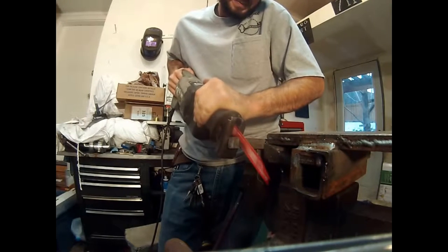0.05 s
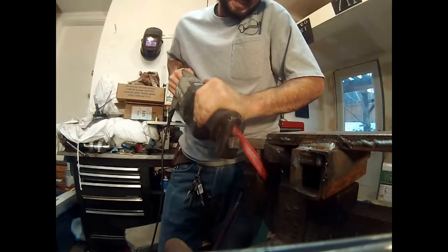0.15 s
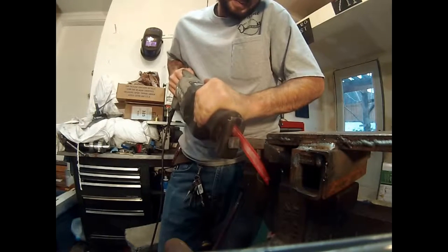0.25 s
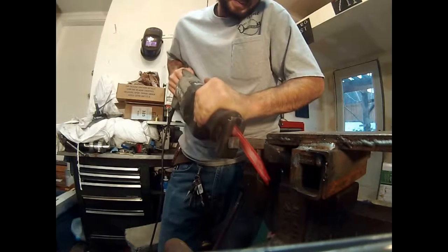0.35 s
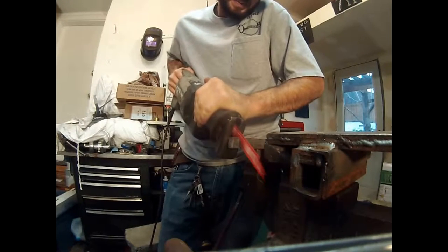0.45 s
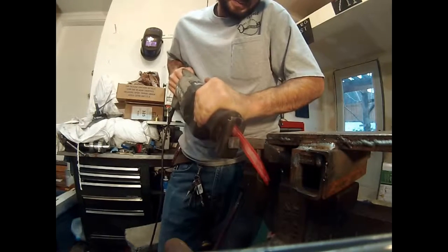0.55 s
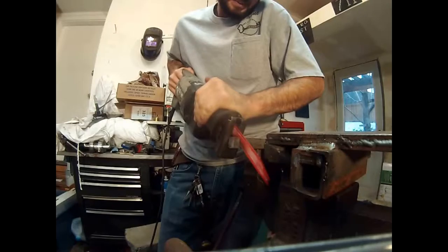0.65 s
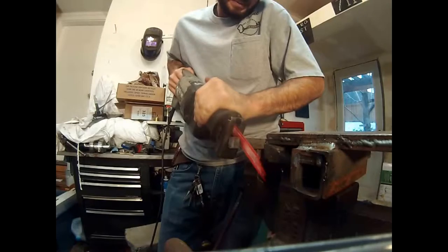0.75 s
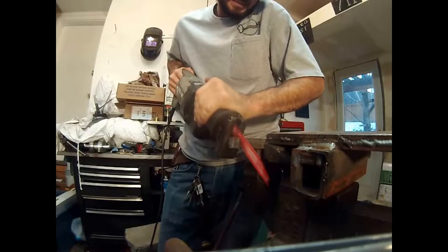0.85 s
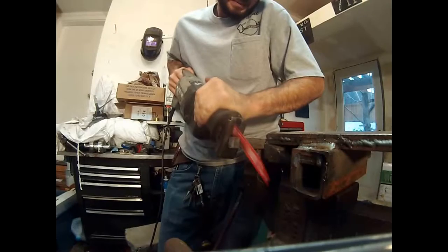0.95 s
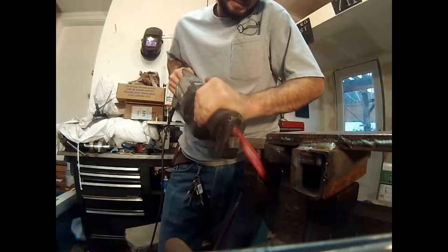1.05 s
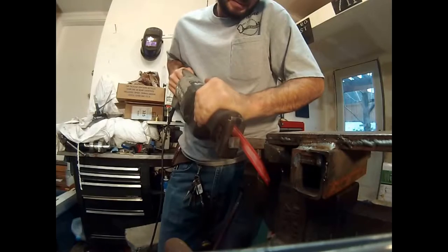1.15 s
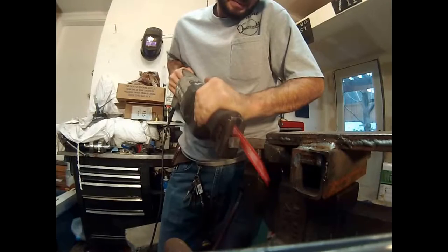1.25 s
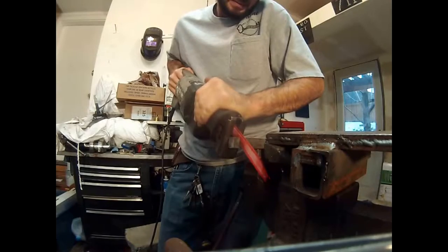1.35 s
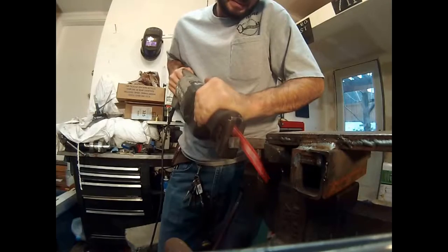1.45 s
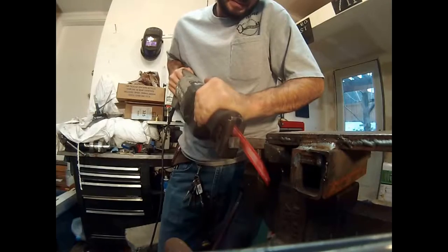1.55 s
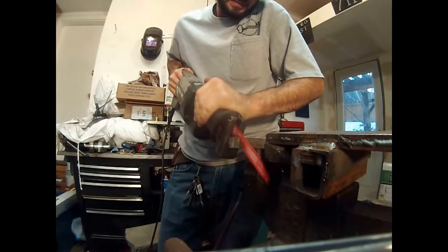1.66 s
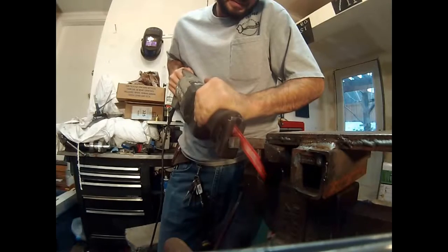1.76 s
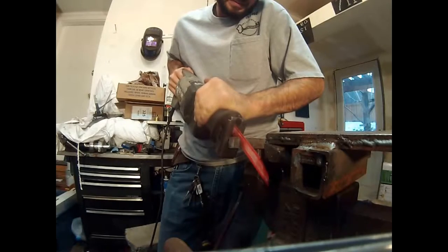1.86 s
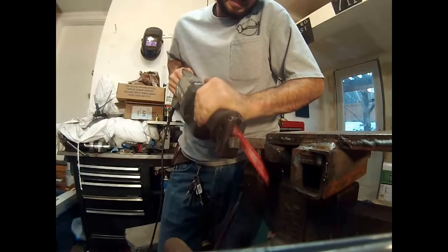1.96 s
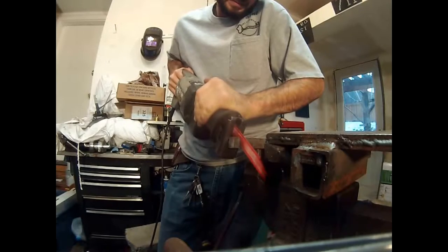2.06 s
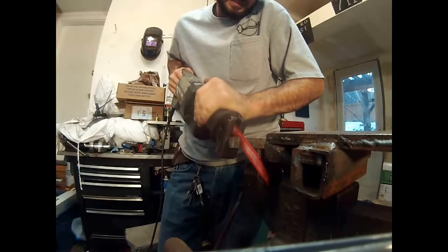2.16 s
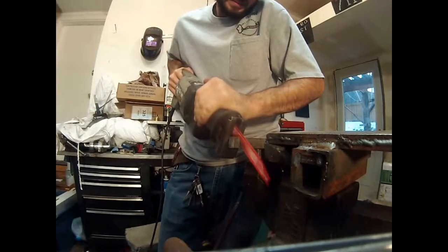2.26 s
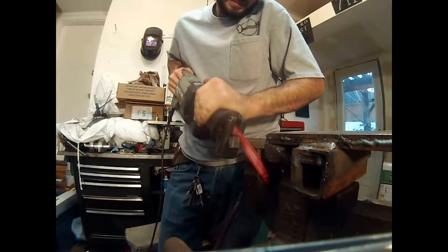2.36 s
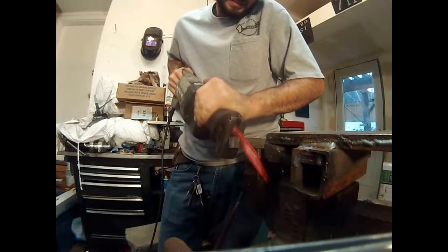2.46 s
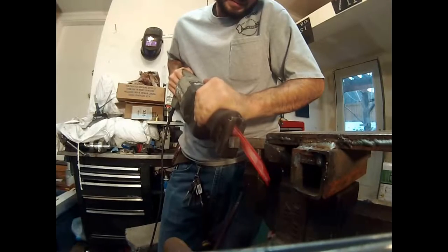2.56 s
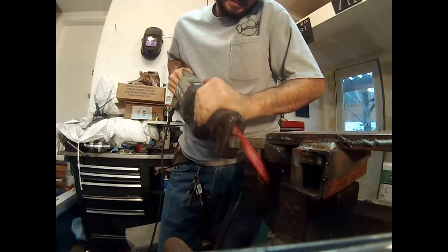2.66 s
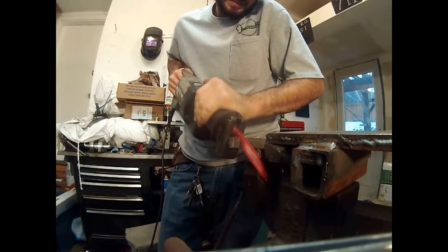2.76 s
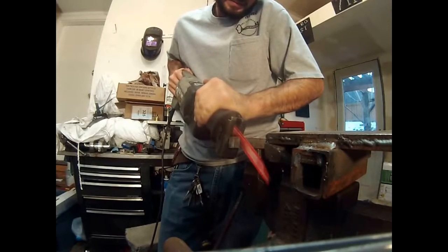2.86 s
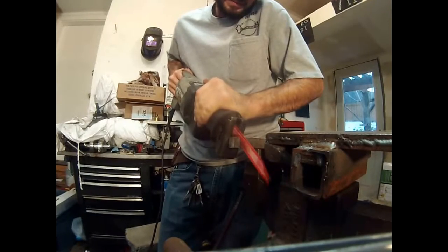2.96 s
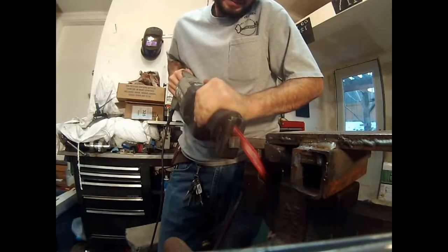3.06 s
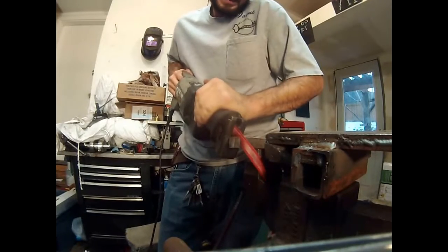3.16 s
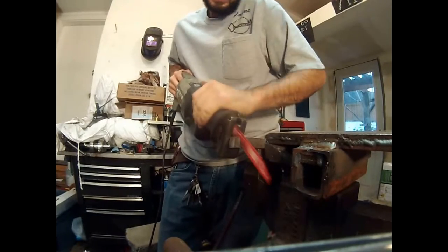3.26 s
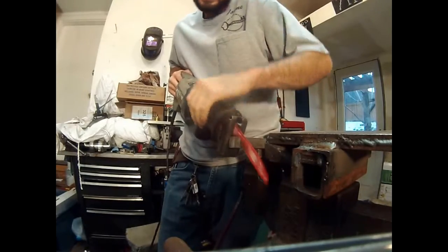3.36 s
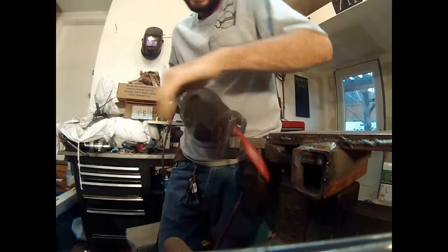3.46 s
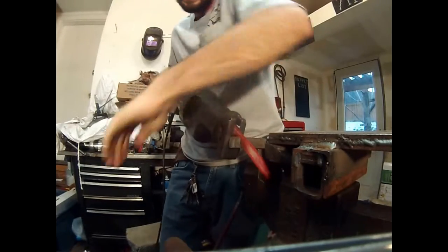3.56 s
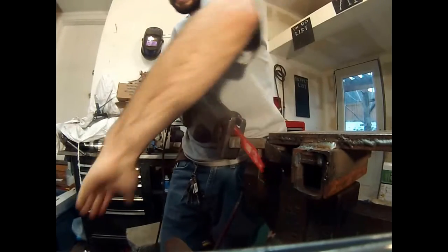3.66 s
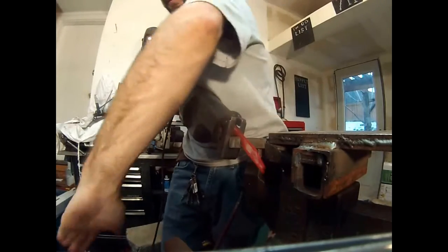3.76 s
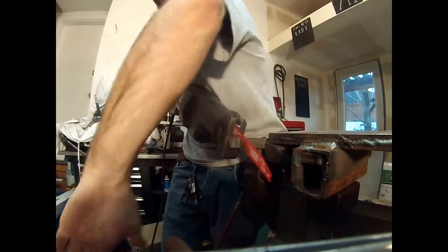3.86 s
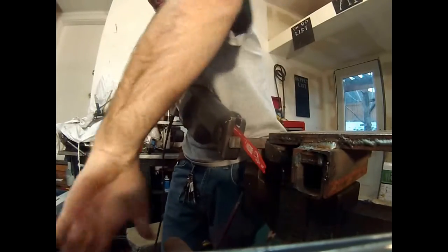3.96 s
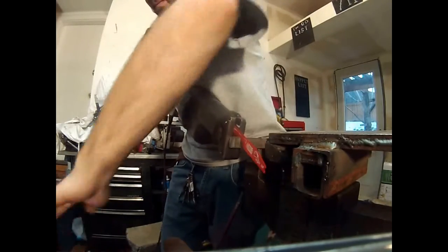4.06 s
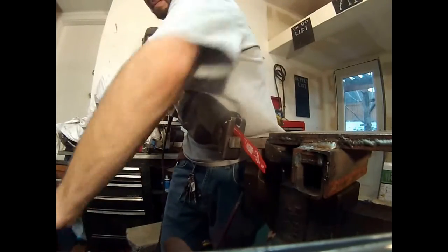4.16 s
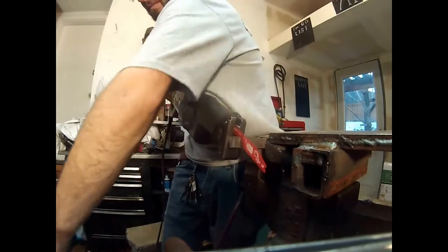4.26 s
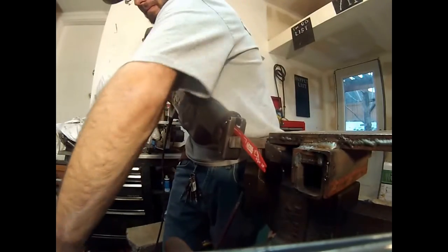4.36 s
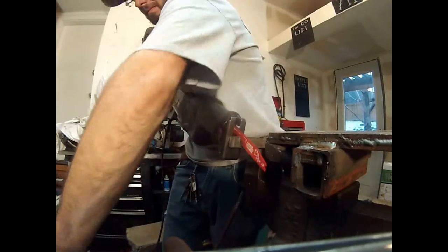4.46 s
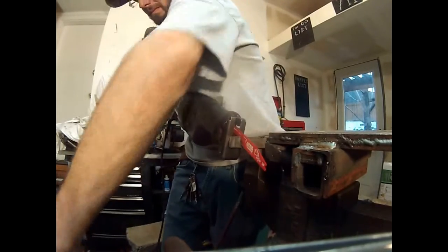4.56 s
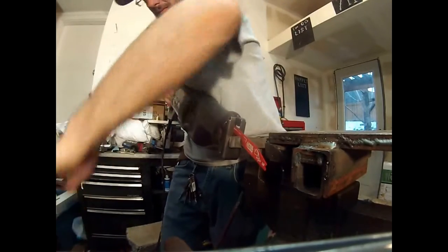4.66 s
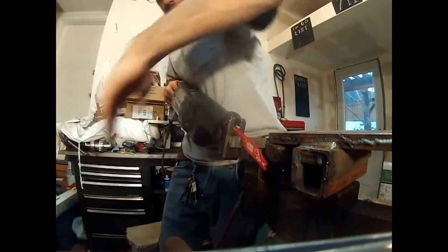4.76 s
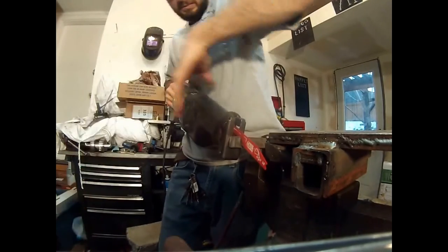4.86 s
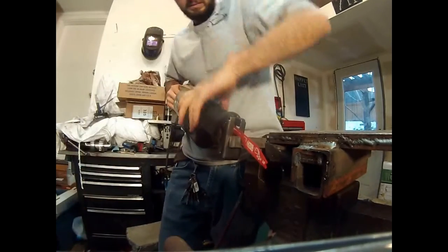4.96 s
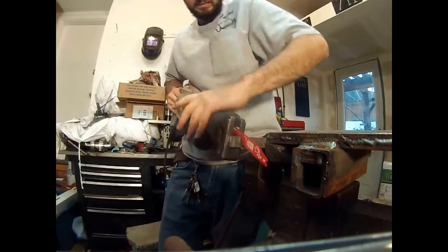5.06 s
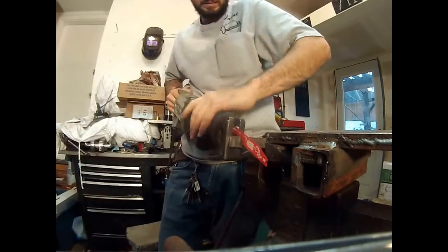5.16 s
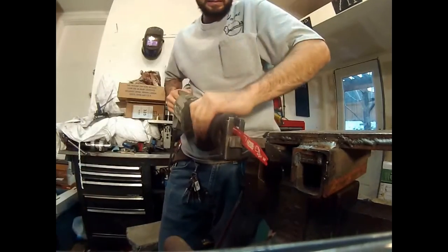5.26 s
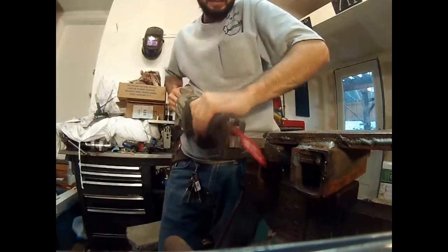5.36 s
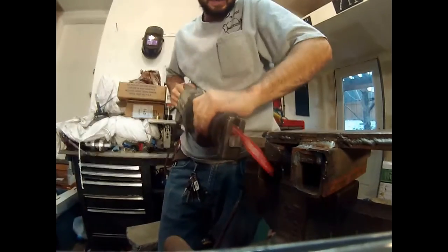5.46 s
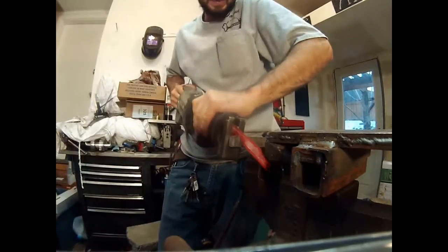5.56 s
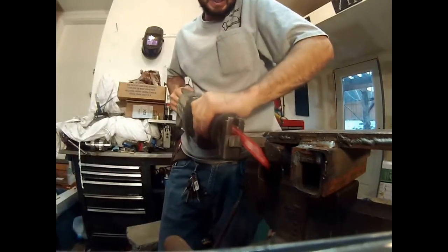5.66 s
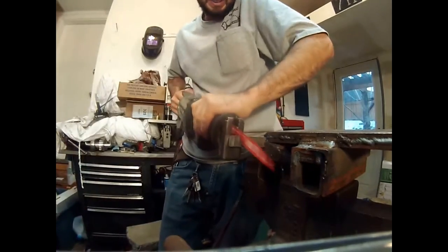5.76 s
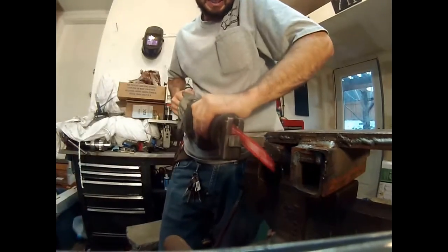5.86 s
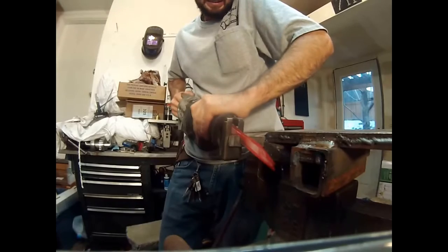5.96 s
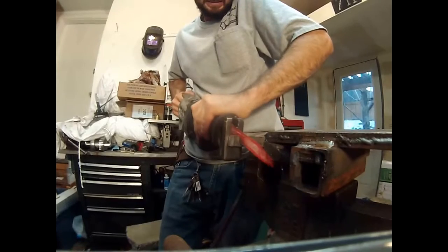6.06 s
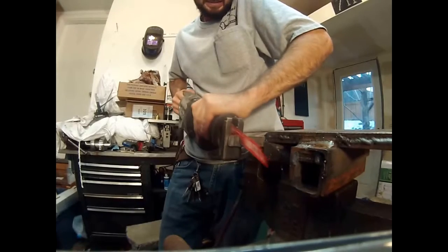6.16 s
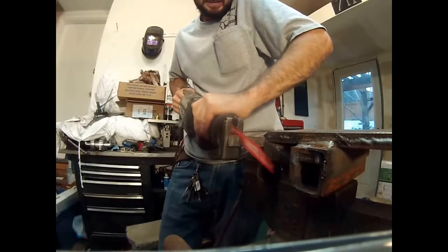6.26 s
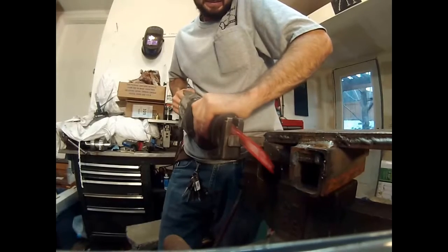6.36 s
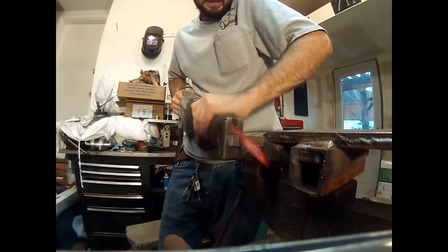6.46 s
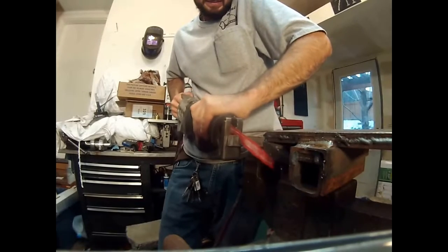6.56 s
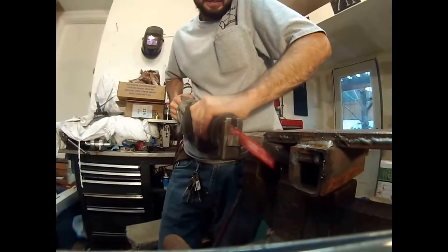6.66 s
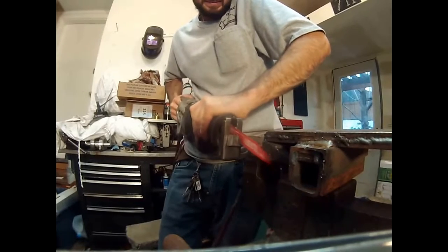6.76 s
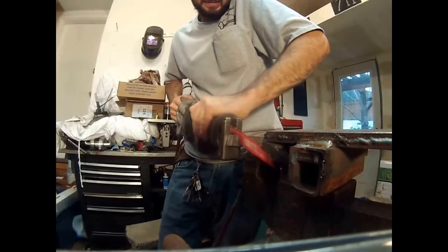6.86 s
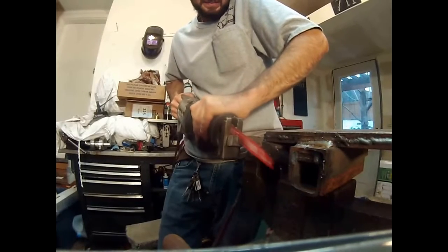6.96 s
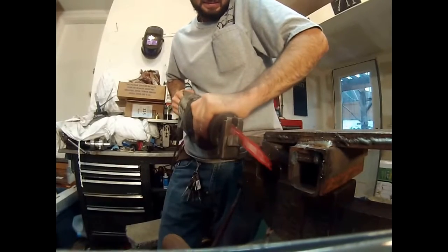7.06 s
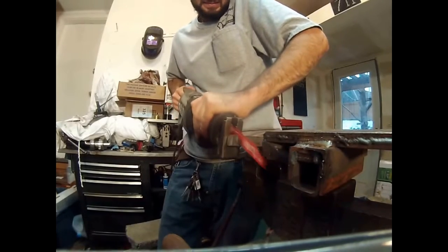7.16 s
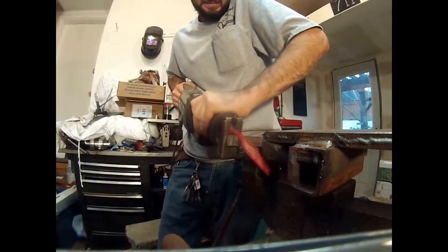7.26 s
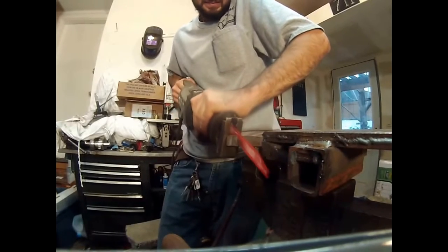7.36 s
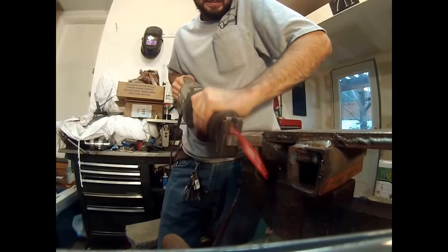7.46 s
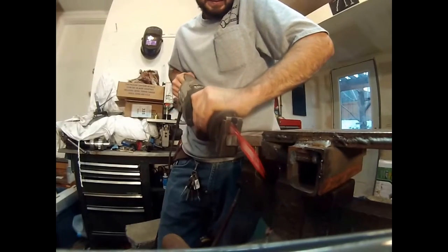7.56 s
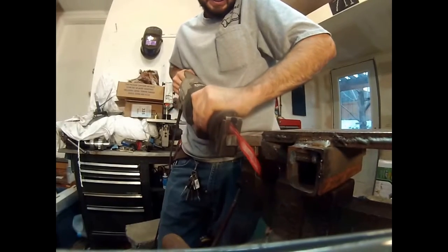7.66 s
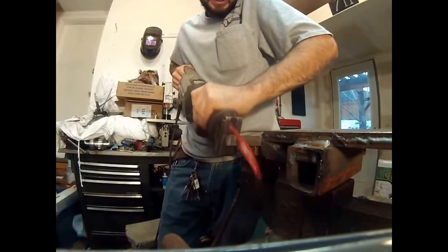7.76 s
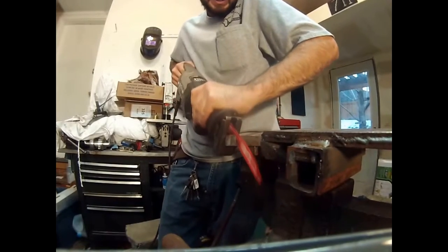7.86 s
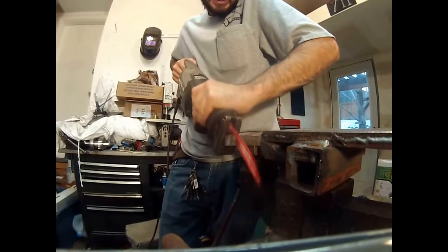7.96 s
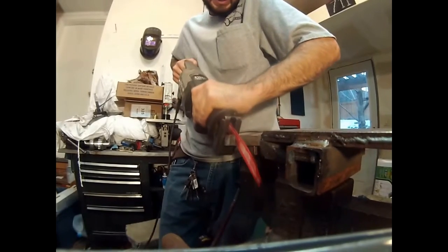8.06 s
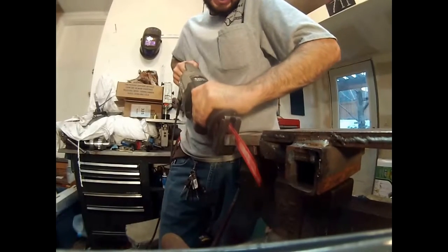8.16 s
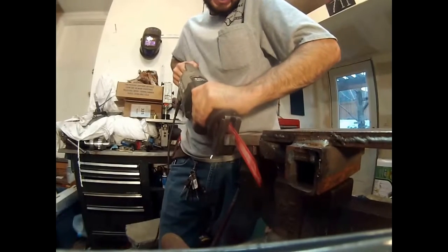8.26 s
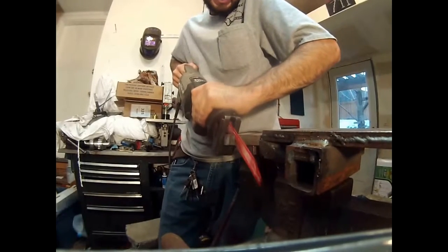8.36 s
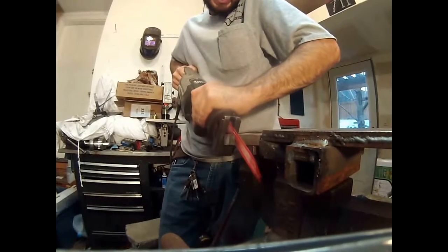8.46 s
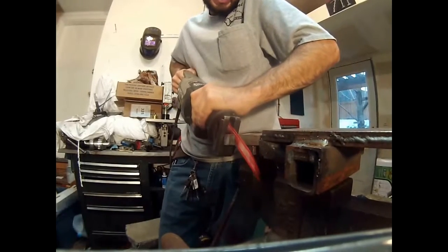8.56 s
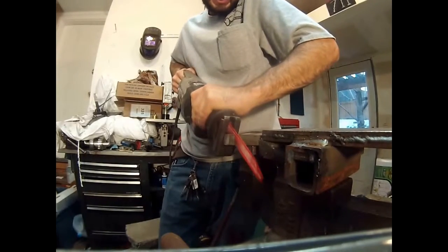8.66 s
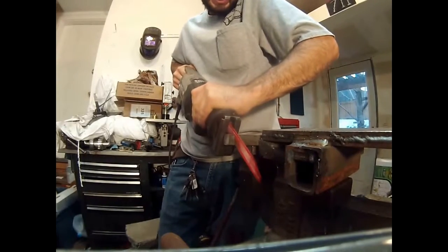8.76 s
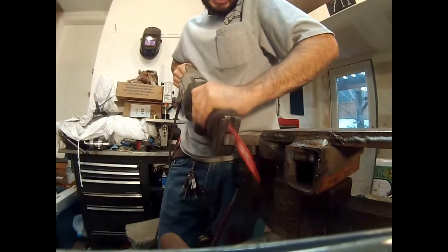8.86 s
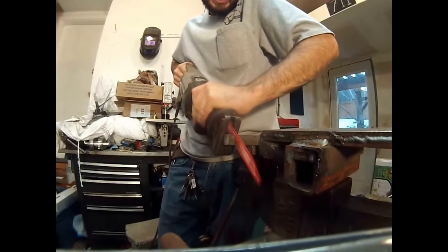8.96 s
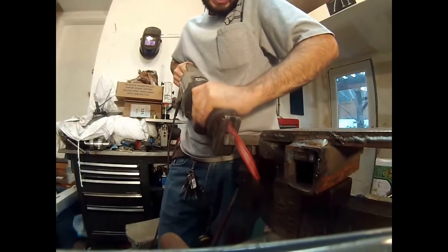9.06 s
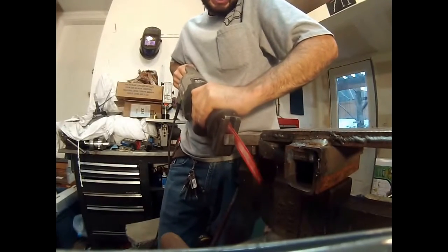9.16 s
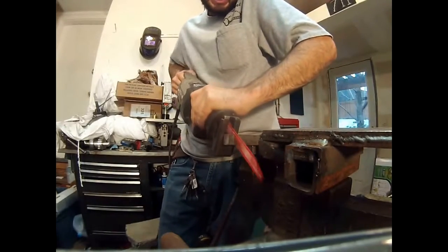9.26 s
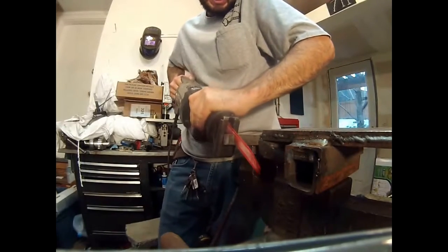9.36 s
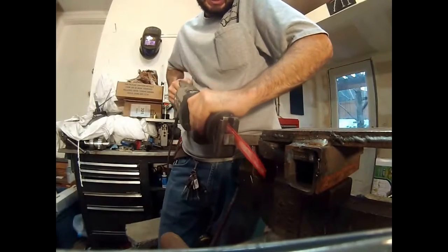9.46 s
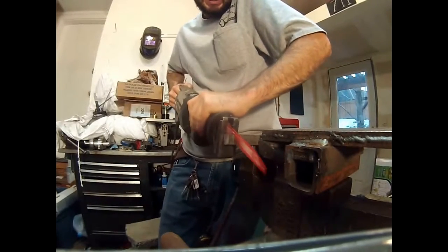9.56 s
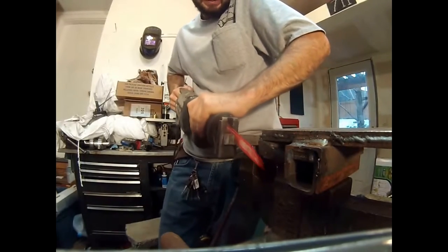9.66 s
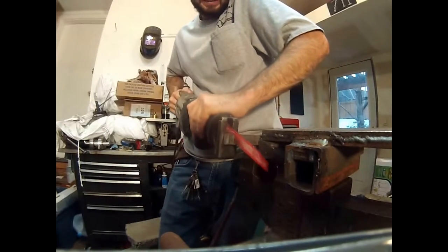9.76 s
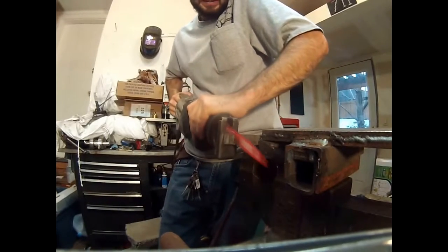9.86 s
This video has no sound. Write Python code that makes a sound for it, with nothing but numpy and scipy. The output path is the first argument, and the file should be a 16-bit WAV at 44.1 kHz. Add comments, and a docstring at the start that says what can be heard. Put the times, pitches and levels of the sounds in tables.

```python
"""A corded reciprocating saw cuts a steel bar held in a vice, close by in a small workshop.
The gears whine, the housing shakes, the teeth rasp and set blade and bar ringing, and the slider
clacks once a stroke. At 3 s the trigger is released and the saw knocks loosely as it coasts to a stop.
A steel piece clinks, is dragged aside and rings; two faint squeaks follow. At 5.3 s the saw jerks
back into the cut, where the blade catches now and then and the shoe hammers the bar."""
import sys
import numpy as np
from scipy import signal
from scipy.fft import rfft, irfft
from scipy.io import wavfile

SR = 44100
rng = np.random.default_rng(int(sys.argv[2]) if len(sys.argv) > 2 else 0)


def file_out(sig):
    """Save sig as 16-bit WAV at sys.argv[1]."""
    # one column per channel
    cols = np.atleast_2d(sig).T
    # limit, then scale
    lim = np.clip(cols, -1, 1)
    pcm = np.round(lim * 32767).astype(np.int16)
    wavfile.write(sys.argv[1], SR, pcm)


N = 436590
TIME = np.arange(N) / SR


def amp(db):
    """Decibels to gain."""
    return 10 ** (np.asarray(db) / 20)


def unit(x):
    """Scales to rms 1."""
    return x / np.sqrt(np.mean(x ** 2) + 1e-20)


def follow(rows):
    """An automation curve's value at every sample."""
    return np.interp(TIME, *np.transpose(rows))


def read(points, hz):
    """Looks up a curve on a log-frequency axis."""
    f, value = np.transpose(points)
    return np.interp(np.log(hz + 1), np.log(f), value)


def add(mix, start_s, sound):
    """Mixes a sound in at start_s."""
    part = mix[round(start_s * SR):][:len(sound)]
    part += sound[:len(part)]


def wander(hz):
    """Smooth random modulation of rms 1, rolled off above hz."""
    return unit(irfft(rfft(rng.standard_normal(N)) / (1 + (np.fft.rfftfreq(N, 1 / SR) / hz) ** 4), N))


def grit(spread_db):
    """Noise in tiny clumps, as of many small impacts."""
    return unit(rng.standard_normal(N) * amp(spread_db * np.clip(wander(470), -3, 2.5)))


def colour(x, points, size=4096):
    """Causal EQ of unit energy with the given curve."""
    log_gain = np.log(amp(read(points, abs(np.fft.fftfreq(size, 1 / SR)))))
    taps = np.fft.ifft(np.exp(np.conj(signal.hilbert(log_gain)))).real[:size // 2]
    return signal.oaconvolve(x, taps / np.linalg.norm(taps))[:N]


def ring(x, modes):
    """Drives a bank of steep-skirted resonators; rms 1."""
    out = np.zeros(N)
    for hz, width, db in modes:
        pole = np.exp((2j * np.pi * hz - np.pi * width * np.sqrt(2)) / SR)
        out += amp(db) * unit(signal.lfilter([1], np.poly([pole, pole]), x).real)
    return unit(out)


def lobe(turns, at, width):
    """A bump once a stroke; place and width are shares of the stroke."""
    return np.exp(-.5 * (((turns - at + .5) % 1 - .5) / width) ** 2)


def swell(start, length, attack_s, release_s):
    """Attack, hold and release of one gesture."""
    rise = 1 - np.exp(-np.maximum(TIME - start, 0) / attack_s)
    return rise * np.exp(-np.maximum(TIME - start - length, 0) / release_s)


def bursts(times, dbs, rise_s, decay_s):
    """Short noise hits, each at its own level."""
    t, out = np.arange(SR // 6) / SR, np.zeros(N)
    shape = (1 - np.exp(-t / rise_s)) * np.exp(-t / decay_s)
    for start, db in zip(times, dbs):
        add(out, start, amp(db) * shape / shape.max() * rng.standard_normal(len(t)))
    return out


RELEASE_S, STICK_S, RESTART_S = 3.084, 4.04, 5.33  # trigger let go, blade sticks, trigger pulled
FULL_HZ = 33  # strokes per second
# Saw speed with the trigger held, one curve per cut: time_s, stroke_rate_hz
FIRST_CUT_SPEED = [(0, 33.42), (0.42, 33.68), (1.1, 33.01), (2.33, 32.83), (2.67, 33.43), (3.1, 32.87)]
SECOND_CUT_SPEED = [(5.33, 0), (5.37, 21), (5.4, 26), (5.45, 18), (5.73, 32.82), (6.09, 30.79),
                    (6.2, 33.04), (6.94, 32.98), (7.59, 31.83), (8.07, 29.8), (8.68, 33.6), (9.9, 33.5)]
def stroke_rate(friction_hz_per_s=24.24, drag_s=2.343):
    """Strokes per second; between the cuts, friction and air drag slow the motor until the blade sticks."""
    brake = friction_hz_per_s * drag_s
    drag = np.exp(-np.maximum(TIME - RELEASE_S, 0) / drag_s)
    first_run = (follow(FIRST_CUT_SPEED) + brake) * drag - brake
    return np.maximum(first_run, 0) * (TIME < STICK_S) + follow(SECOND_CUT_SPEED)


# Level of the saw's own whine and shake, which falls while the blade is loaded: time_s, gain_db
TOOL_NOISE_LEVEL = [(0, 0), (1.7, 1.6), (2.9, 0.5), (5.4, 2.5), (5.75, -4), (6.7, -3.5), (7.1, -5), (8.2, -3.5),
                    (8.75, -1), (9.35, 0.4), (9.9, -7.5)]
# Commutator whistle, before it fades with lost speed: time_s, level_db
WHISTLE_RIDE = [(0, -28.5), (.7, -25), (2.2, -25), (2.5, -34), (5.7, -32.5)]
# Gearcase resonances: pitch_hz, width_hz, gain_db
GEARCASE_MODES = [(1080, 67, 3.5), (1173, 19.6, -1.5), (1270, 84, 1), (1695, 75, 0.5)]
def motor(turns, speed, slow_db):
    """Gear mesh and commutator; the crank loads the gears twice a stroke, so the whine sways and throbs."""
    mesh, commutator = 60 * turns, 60 * 12 / 7 * turns
    sway = 0.095 * np.sin(2 * np.pi * turns) + 0.055 * wander(60) + 0.018 * wander(26)
    throb = unit(.18 + lobe(turns, .06, .12) + .75 * lobe(turns, .38, .11))
    gears = throb * amp(2 * wander(54)) * np.sin(2 * np.pi * (mesh + sway))
    gears += amp(-19) * throb * np.sin(4 * np.pi * (mesh + sway))
    whistle = np.sin(2 * np.pi * (commutator + 0.06 * wander(30)))
    whistle *= amp(follow(WHISTLE_RIDE) + 11 * slow_db)
    rattle = amp(-6.5) * ring(throb * grit(1.6), GEARCASE_MODES)
    coast_fade_db = 2.5 * (np.maximum(FULL_HZ - speed, 0) / 10) ** 3 * (TIME < RESTART_S)
    return amp(-21 + follow(TOOL_NOISE_LEVEL) - coast_fade_db) * (gears + rattle) + whistle


# Low buzz of the housing: stroke_harmonic, gain_db
SHAKE_HARMONICS = [(1, -41), (2, -6.5), (3, 1), (4, -3), (5, -6), (6, -1), (10, -7.5), (14, -10)]
# Boom of the tool and bench when jerked: pitch_hz, width_hz, gain_db
LURCH_MODES = [(70, 22, -11), (107, 30, -1), (200, 67, -6.5)]
def housing(turns, speed):
    """The sliding mass shakes the tool at multiples of the stroke rate; at low speed it lurches."""
    buzz = sum(amp(db) * (1 + 0.21 * wander(3.3)) * np.sin(2 * np.pi * k * turns + 0.3016 * k ** 2)
               for k, db in SHAKE_HARMONICS)
    steady = np.clip((speed - 24) / 7, 0, 1)
    lurch = np.sqrt(speed / 25) * ring(grit(0.91), LURCH_MODES)
    return amp(-29.5 + 1.16 * follow(TOOL_NOISE_LEVEL)) * (steady * unit(buzz) + (1 - steady) * lurch)


# Leaning the saw into the bar: start_s, length_s, thump_db, chatter_db
LEANS = [(-.1, 3.22, -30, -40.5), (5.4, 0.042, -45, -17.5), (5.63, 0.27, -52, -22.5),
         (5.984, 0.13, -22.5, -22), (6.233, 0.039, -28, -32), (6.586, 0.26, -23.5, -25.5),
         (7.21, 0.52, -23.5, -27.5), (7.828, 0.25, -22, -22), (8.207, 0.3, -40, -29),
         (8.98, 0.35, -28, -31), (9.632, 0.099, -25.5, -42), (9.81, .1, -22.5, -22)]
def leaning(slow_db):
    """Gains of the shoe's thump and the blade's chatter, which swell as the saw is pushed in."""
    thump, chatter = amp(-35.5 + 0.8 * slow_db), amp(-32 + 0.51 * slow_db)
    for start, length, thump_db, chatter_db in LEANS:
        push = swell(start, length, attack_s=0.025, release_s=0.077)
        thump = np.hypot(thump, amp(thump_db) * push)
        chatter = np.hypot(chatter, amp(chatter_db) * push)
    return thump, chatter


# EQ of teeth rasping on steel: frequency_hz, gain_db
RASP_EQ = [(60, -10), (250, -8.5), (900, -6.5), (1300, -3.5), (1800, 3), (2700, -4), (4000, -0.5),
           (7000, -10.5), (8800, -20.5), (11500, -22.5), (13500, -16.5), (15300, -25)]
# Blade chatter, squeal of the cut's edges and high screech of the teeth: pitch_hz, width_hz, gain_db
BLADE_MODES = [(1027.8, 24, 0)]
KERF_MODES = [(1540, 7.7, -13), (1735, 25, -2), (1866, 175, 2)]
SCREECH_MODES = [(6700, 74, 12), (8170, 47, 0), (9690, 50, -4.5), (10169, 36, -9), (10616, 30, -24),
                 (13300, 90, 1), (13313, 30, -18)]
def teeth(turns, rasp_db, squeal_db, chatter):
    """Teeth scrape in both directions and ring the blade and the edges of the cut."""
    rub = unit(0.77 + 0.16 * lobe(turns, 0.61, 0.11) + 0.59 * lobe(turns, 0.98, 0.05))
    snag = amp(np.clip(0.063 * (squeal_db + 48), .5, 3) * wander(27))  # more pressure, less even bite
    rasp = amp(rasp_db + 1) * colour(unit(rub * snag) * grit(1.9), RASP_EQ)
    flex = ring(grit(0.55), BLADE_MODES)
    flex /= abs(signal.hilbert(flex)) ** .5  # friction limits the blade's swing
    blade = amp(-1) * chatter * unit(flex * (0.33 + lobe(turns, 0.32, 0.23)))
    squeal = amp(squeal_db) * ring(rub * grit(5.6), KERF_MODES)
    grab = amp(3 * np.clip(wander(18), -2, 1))
    screech = amp(1.31 * squeal_db) * ring(rub * grab * grit(7.6), SCREECH_MODES)
    return rasp + blade + squeal + screech


# Bright ring of the slider and its guide: pitch_hz, width_hz, gain_db
CLACK_MODES = [(3100, 780, 8), (5570, 930, 4), (6490, 410, 2), (7630, 160, -1), (13040, 400, -5.5)]
# Dull EQ of the shoe pressing on the bar: frequency_hz, gain_db
THUMP_EQ = [(22, -37), (50, -21), (95, -4.5), (180, 3), (280, -3), (480, 4), (680, -2.5), (1200, -7.5),
            (6000, -64.5)]
def slider(turns, speed, rasp_db, squeal_db, thump):
    """Play in the drive clacks at the turn of each stroke; then the shoe thumps on the bar."""
    stroke = np.floor(turns + .5).astype(int)
    force, timing, push = rng.standard_normal((stroke.max() + 1, 3))[stroke].T
    since_hit = (turns + .5) % 1 - .5 + .03 * (1 + 0.23 * timing)  # in strokes
    up_to_speed = np.clip((speed - 28) / 3, 0, 1)
    hit = (since_hit > 0) * np.exp(-abs(since_hit) / .06) * amp(1.1 * force) * up_to_speed
    contact = unit(hit * grit(0.88))
    cushion_db = .5 * np.maximum(squeal_db + 35.5, 0)  # a hard-pressed blade takes up the play
    clack = ring(contact, CLACK_MODES) + amp(-5) * colour(contact, RASP_EQ)
    press = unit(.15 + lobe(turns, .3, .09) * amp(1.5 * push))
    return amp(rasp_db - 8 - cushion_db) * clack + thump * colour(press * grit(1.5), THUMP_EQ)


# The bar singing under the saw: pitch_hz, width_hz, gain_db
BAR_MODES = [(779.5, 19.5, 8), (1179, 60, 3), (2308, 35, 7.5), (2558, 70, 6), (3990, 26, 4),
             (13200, 300, -19)]
# Its ring-out as the saw stops: pitch_hz, level_db, t60_s
BAR_RING_OUT = [(768, -27.5, 0.46), (1154, -27, 0.3), (3890, -41, 1.5)]
def bar(rasp_db, running):
    """The clamped bar sings along with the saw and rings on after the first cut's last stroke."""
    song = amp(-15 + 0.67 * rasp_db) * ring(running * grit(2.4), BAR_MODES)
    t = np.arange(SR) / SR
    tail = sum(amp(db - 60 * t / t60) * np.sin(2 * np.pi * hz * t) for hz, db, t60 in BAR_RING_OUT)
    add(song, HARD_KNOCKS[0][0], tail)
    return song


# Hard knocks as the saw stops and restarts, in relative levels: start_s, clack_db, thump_db
HARD_KNOCKS = [(3.9512, -9, -15), (4.028, -13.5, -38), (5.343, -8.5, -24.5), (5.416, -14, -30),
               (5.475, -10, -24), (5.612, -10, -41)]
# EQ of the shoe striking the bar: frequency_hz, gain_db
SHOE_HIT_EQ = [(100, -7), (900, -9.5), (1100, 10), (1450, -7), (2200, 6.5), (3000, -1), (9000, -23)]
def knocks(stroke_s, stroke_hz):
    """Coasting strokes, the stop and the start knock the slider, each jerking the whole tool."""
    slow = (stroke_hz > 7) & (stroke_hz < 29.5) & (stroke_s > RELEASE_S) & (stroke_s < STICK_S)
    scatter_db = .6 * rng.standard_normal(slow.sum())
    loose = [(start, -14 + db, -16.5 - 0.3251 * hz + db)  # the slower the stroke, the heavier the thump
             for start, hz, db in zip(stroke_s[slow], stroke_hz[slow], scatter_db)]
    starts, clack_db, thump_db = np.transpose(HARD_KNOCKS + loose)
    contact = bursts(starts, clack_db, rise_s=.0002, decay_s=.0018)
    clacks = amp(1) * contact.std() * ring(contact, CLACK_MODES) + amp(-4.5) * colour(contact, RASP_EQ)
    jerk = bursts(starts + 0.00731, thump_db - 5.5, rise_s=0.0031, decay_s=0.019)
    thumps = colour(jerk, THUMP_EQ) + amp(-8.5) * jerk.std() * ring(jerk, LURCH_MODES)
    # the shoe rattles back onto the bar
    rebound = bursts(starts + .01, thump_db - .5, rise_s=0.001, decay_s=0.0065)
    return clacks + thumps + colour(rebound, SHOE_HIT_EQ)


# Clinks of the steel piece: start_s, level_db, damped_after_s
STEEL_CLINKS = [(4.044, -26, 0.059), (4.591, -26, .9)]
# Its bright partials: pitch_hz, gain_db, t60_s
STEEL_MODES = [(4760, -23, .6), (5055, -5, 0.37), (5640, -6, .4), (5950, 0, 0.77), (7278, -4, 0.54),
               (8560, -7, 0.23), (9300, -18, 0.25), (10370, -12, 0.37), (11180, -22, .2), (11600, -8, .22),
               (13330, -14, 0.18), (13880, -13, .36)]
def clinks():
    """The struck steel piece rings until a hand damps it; each mode is a close pair, so it beats."""
    t, out = np.arange(SR) / SR, np.zeros(N)
    for start, level_db, damped_after_s in STEEL_CLINKS:
        partials = np.zeros(SR)
        for hz, db, t60 in STEEL_MODES:
            beat = 1 + 0.26 * np.cos(2 * np.pi * rng.uniform(10, 40.6) * t)
            partials += amp(db - 60 * t / t60) * np.sin(2 * np.pi * hz * t) * beat
        strike = 1 + np.exp(-t / 0.006) * wander(950)[:SR]  # the contact chatters for an instant
        damping = np.exp(-np.maximum(t - damped_after_s, 0) / 0.0027)
        add(out, start, amp(level_db) * partials * strike * damping)
    return out


# The steel piece sliding, a hand over the grip, then the motor's brief hum as it starts:
# start_s, length_s, level_db
HANDLING_SLIDES = [(4.341, .2, -31), (4.582, 0.067, -34.5), (5.028, 0.13, -51), (5.318, .015, -33)]
# Small handling taps: start_s, relative_level_db
HANDLING_TAPS = [(4.432, -9), (4.46, -10), (4.532, -32), (4.58, -11), (4.937, -31.5), (5.267, -40),
                 (5.299, -34.5)]
# EQ of the slides and taps: frequency_hz, gain_db
HANDLING_EQ = [(40, -30), (100, 1), (220, -5.5), (550, -1), (2200, -5), (6000, -10), (15000, -26)]
def handling():
    """Gritty swells and light bumps as the steel is dragged aside and the saw is taken up and started."""
    sliding = sum(amp(db) * swell(start, length, attack_s=0.021, release_s=0.043)
                  for start, length, db in HANDLING_SLIDES)
    scrape = sliding * grit(2.1) * amp(1.8 * wander(90))
    starts, tap_db = np.transpose(HANDLING_TAPS)
    taps = bursts(starts, tap_db - 11.5, rise_s=0.00047, decay_s=0.0078)
    return colour(scrape + taps, HANDLING_EQ)


# Faint squeaks: start_s, length_s, level_db
FAINT_SQUEAKS = [(4.83, 0.059, -59), (5.12, 0.031, -46)]
# Their thin tone: pitch_hz, width_hz, gain_db
SQUEAK_MODES = [(3820, 36, 0)]
def faint_squeaks():
    """Two faint, thin squeaks near 3.8 kHz in the pause."""
    envelope = sum(amp(db) * swell(start, length, attack_s=.01, release_s=.012)
                   for start, length, db in FAINT_SQUEAKS)
    return envelope * ring(grit(1), SQUEAK_MODES)


# The blade catching in the second cut: start_s, length_s, relative_level_db
BLADE_CATCHES = [(5.42, .08, -11), (7.89, .23, -9.5), (8.12, .16, -15), (9.4, .03, -13)]
def hammering(stroke_s, lead_s=.007):
    """While the blade is caught, the shoe is thrown against the bar just before each stroke turns."""
    hits = [(s, db) for start, length, db in BLADE_CATCHES for s in stroke_s if start <= s < start + length]
    starts, hit_db = np.transpose(hits)
    return colour(bursts(starts - lead_s, hit_db - 1, rise_s=0.0035, decay_s=0.006), SHOE_HIT_EQ)


# Reverb time of the workshop: frequency_hz, t60_s
ROOM_DECAY = [(1000, 0.65), (14000, 0.15)]
def workshop(x):
    """Dense reflections off near walls, the treble dying first."""
    size = SR // 2
    reflections = rng.standard_normal(size) * (rng.random(size) < 3000 / SR)
    reflections *= np.arange(size) > SR // 250  # 4 ms pre-delay
    hz, t, spectrum = signal.stft(reflections, SR, nperseg=256)
    tail = signal.istft(spectrum * amp(-60 * t / read(ROOM_DECAY, hz)[:, None]), SR, nperseg=256)[1]
    return signal.fftconvolve(x, tail / np.linalg.norm(tail))[:N]


# How hard the teeth bite: time_s, depth (0 skimming, 1 digging in)
BITE_DEPTH = [(0, .02), (.9, 0.34), (2.15, 0.63), (2.5, .05), (3.15, 0.37), (5.39, 1), (5.53, 0.73),
              (5.9, 0.86), (6.35, 0.27), (6.75, 0.79), (7.05, 0.067), (7.5, 0.51), (8.2, .3), (8.7, 0.19),
              (9.5, 0.51), (9.9, 0.15)]
# EQ of the quiet room tone: frequency_hz, gain_db
ROOM_TONE_EQ = [(30, -1), (136, 2), (2000, -16), (5500, -17), (15000, -44)]
def scene():
    """Speed and bite drive the saw's layers; handling fills the pause, over reverb and room tone."""
    speed, bite = stroke_rate(), follow(BITE_DEPTH)
    travel = np.cumsum(speed) / SR  # in strokes
    turns = travel - .02
    reversals = np.flatnonzero(np.diff(np.floor(travel)))
    slow_db = 20 * np.log10(np.clip(speed / FULL_HZ, .01, 1))  # 0 at full speed, negative below
    # unpowered strokes rub less between the knocks
    coast_db = -2.5 * np.clip((TIME - RELEASE_S) / 0.27, 0, 1) * (TIME < RESTART_S)
    rasp_db = -23.5 + 5.5 * bite + 0.63 * slow_db + coast_db
    squeal_db = -36 + 19 * bite + 1.8 * slow_db
    thump, chatter = leaning(slow_db)
    running = np.clip(speed / 1.8, 0, 1)
    running *= np.clip(abs(TIME - RESTART_S) / 0.068, 0, 1) ** 2  # the blade bites just after the restart
    saw = motor(turns, speed, slow_db) + slider(turns, speed, rasp_db, squeal_db, thump)
    saw += teeth(turns, rasp_db, squeal_db, chatter * amp(coast_db))
    blows = knocks(TIME[reversals], speed[reversals]) + hammering(TIME[reversals])
    close = running * saw + bar(rasp_db, running) + blows + handling() + faint_squeaks() + clinks()
    room_tone = amp(-56) * colour(rng.standard_normal(N), ROOM_TONE_EQ)
    return (amp(-0.66) * close + amp(-13) * workshop(close) + housing(turns, speed) + room_tone)[None]


def record(dry, cutoff_hz=15400):
    """Soft clipping on the hardest peaks, then a steep low-pass."""
    limited = dry / (1 + abs(dry) ** 6) ** (1 / 6)
    lowpass = signal.firwin(511, cutoff_hz, window=("kaiser", 9), fs=SR)
    return signal.oaconvolve(limited, lowpass[None], "same")


dry = scene()
out = record(dry)
file_out(out)
```